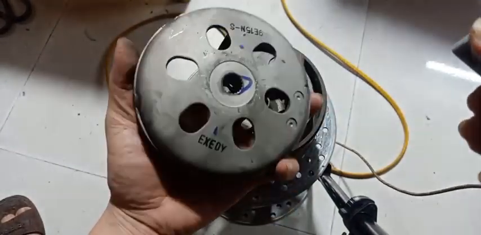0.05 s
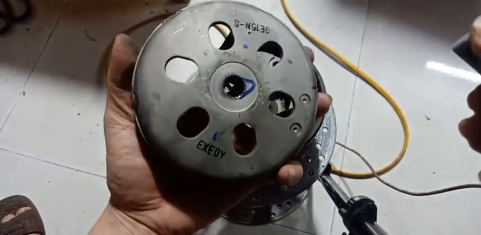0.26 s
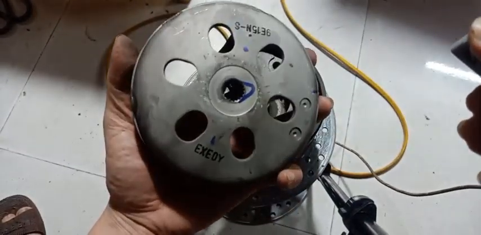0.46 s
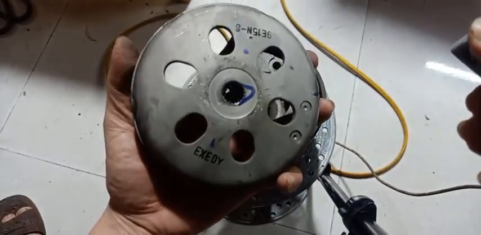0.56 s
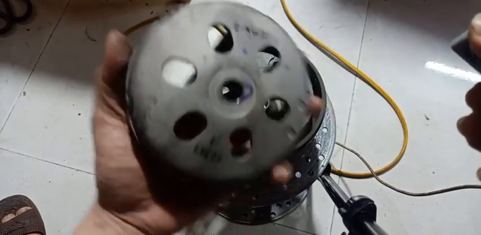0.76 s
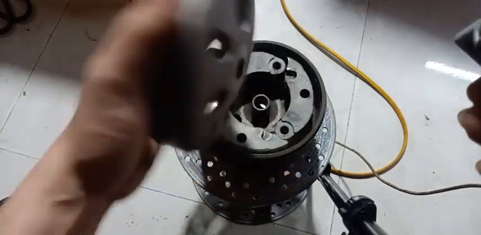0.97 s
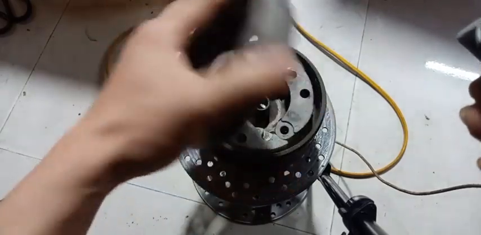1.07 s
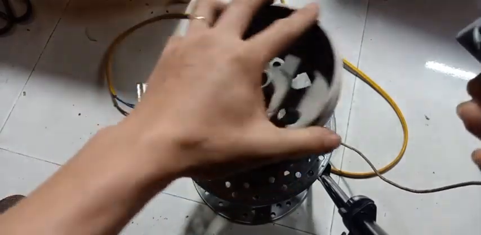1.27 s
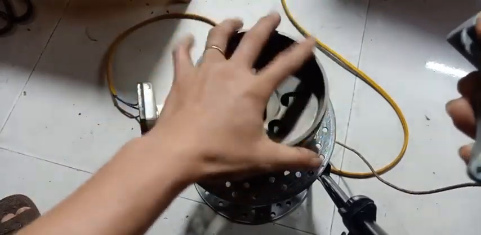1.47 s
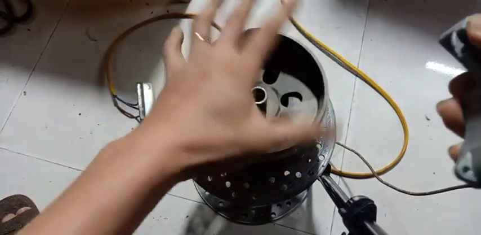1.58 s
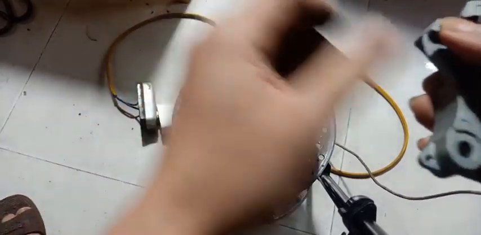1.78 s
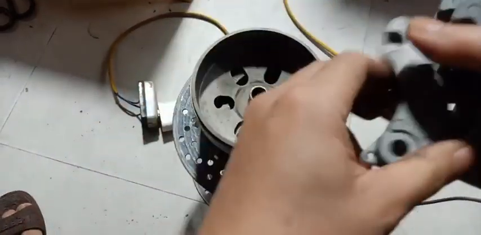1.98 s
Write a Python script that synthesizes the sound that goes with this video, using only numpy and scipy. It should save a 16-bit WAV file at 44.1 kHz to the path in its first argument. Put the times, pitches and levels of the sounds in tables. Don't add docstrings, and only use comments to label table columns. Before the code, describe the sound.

One sharp metallic clank of a steel part set on other metal, ringing briefly in a hard room

```python
import sys
import numpy as np
from scipy import signal
from scipy.fft import rfft, irfft
from scipy.io import wavfile
from scipy.ndimage import uniform_filter1d

SR = 44100
rng = np.random.default_rng(int(sys.argv[2]) if len(sys.argv) > 2 else 0)


def attenuation_scalar(level_db):
    decades = np.asarray(level_db, float) / 20
    return 10 ** decades


def generate_wav(signal):
    frames = np.transpose(np.atleast_2d(signal))
    scaled = np.clip(frames, -1, 1) * 32767
    pcm = np.round(scaled).astype(np.int16)
    wavfile.write(sys.argv[1], SR, pcm)


N = 90272

# (time [s], firing rate [Hz], exhaust [dB], low boom [dB], mechanical hiss [dB])
RIDE = [(0, 35.38, -64, -60, -56.5), (.2, 34.97, -69.5, -68, -58.5), (.42, 34.4, -59.5, -76, -55),
        (.8, 34.86, -56, -70, -50.5), (1.04, 35.1, -48, -88, -47.5), (1.2, 34.91, -50.5, -68, -46.5),
        (1.44, 34.71, -49.5, -65, -44.5), (1.49, 34.6, -50, -64, -49), (1.62, 33.51, -56, -76, -47),
        (1.72, 32.75, -71, -60.5, -50), (1.9, 32.3, -72, -57.5, -58.5), (2.05, 33.02, -72, -59.5, -55.5)]
# (frequency [Hz], level [dB])
EXHAUST_TONE = [(70, -9.5), (140, -2), (209, 7), (260, -1.5), (320, -2), (520, -6), (1000, -16.5),
                (2200, -60)]
# (frequency [Hz], level [dB])
BOOM_TONE = [(30, -38.5), (70, -7.5), (100, 13), (135, 15.5), (180, -12.5), (300, -72.5)]
# (frequency [Hz], level [dB])
HISS_TONE = [(150, -28.5), (400, -3), (900, 1), (1500, -3), (2600, 1.5), (4000, -7.5), (6000, -6),
             (15000, -23.5)]
WHINE_HZ = [2583, 2640, 2390, 922]
# (pitch wander [%], level re hiss [dB])
WHINE = [(.25, -12), (.45, -11), (2., -14), (.4, -13)]
# (frequency [Hz], level [dB])
TOWN_TONE = [(25, -42), (130, -3.5), (230, -8), (690, -9), (1200, -17), (2200, -14), (5000, -23),
             (15000, -51)]
# (time [s], ring [dB], crack [dB], crack T60 [s])
CONTACTS = [
    (1.5057, -12, -4, .018),
    (1.5172, -6, -8, .025),
    (1.5222, -22, -14, .06),
    (1.533, -26, -19, .05),
    (1.541, -28, -21, .04),
]
DRUM_HZ = [2500, 2627, 2665, 2706, 3499, 3920, 4153, 4420, 4594, 4978, 5312, 6148, 6680, 7477]
DRUM_DB = [-13, -20, -11, -12, -12, -12, 2, -12, -1, 0, -13, -10, -10, -10]
DRUM_T60 = [0.13, 1, 0.14, 0.12, 0.25, 0.26, 0.14, 0.09, 0.21, 0.21, 0.13, 0.4, 0.055, 0.26]
STACK_HZ = [1850, 2010, 2315, 2387, 3209, 6798, 7276, 8200]
# (level [dB], T60 [s])
STACK = [(-14, .08), (-13, .08), (-24, .4), (-23, .4), (-11, .12), (-11, .12), (-12, .16), (-12, .14)]
# (frequency [Hz], level [dB])
CRACK_TONE = [(60, -26), (300, -23.5), (1300, -7.5), (2200, -5), (2700, -2), (4600, -8), (6200, -5),
              (15000, -19)]
THUD_S = [1.5066, 1.5186, 1.5212, 1.5185]
# (frequency [Hz], left level [dB], right level [dB])
THUD = [(800, -17, -23), (760, 0, -20), (430, -6, -15), (155, -30, -28)]
# (band centre [Hz], T60 [s], level [dB])
ROOM = [(139.15, .14, -28.5), (320.5, 0.123, -30.5), (556, 0.2, -28), (1160, 0.18, -23),
        (2590, 0.73, -19.5), (5162, 0.46, -23.5), (8000, 0.56, -15), (12600, 0.1, -14)]
# (frequency [Hz], level [dB])
PHONE_TONE = [(25, -9), (80, 0), (1600, 0), (2600, 3), (3350, -6), (4200, 2), (6300, 0), (7000, -10)]
PORT_HZ = [7000, 9200, 10000, 10900, 12200, 14100, 14800]
LEFT_PORT_DB = [0, 2, -21.5, 0.5, 8, -4.5, -19]
RIGHT_PORT_DB = [-0.5, -4, -7, -15, -8, -12, -24]

LAG = 19
ALIKE_HZ = 575
LEFT_DB = 1
SPREAD_S = 0.027
TOWN_DB = -56
CHOKE_S, CHOKE_DB, CHOKING_S = 1.555, -10, .03
TOP_HZ = 15700


def unit(x):
    return x / np.sqrt(np.mean(x ** 2))


def colour(x, table):
    hz, db = np.array(table, float).T
    grid_hz = np.arange(2049) * SR / 4096
    log_gain = np.interp(np.log(grid_hz + 1), np.log(hz), db) * np.log(10) / 20
    cepstrum = irfft(log_gain) * np.r_[1, np.full(2047, 2), 1, np.zeros(2047)]
    impulse = irfft(np.exp(rfft(cepstrum)))
    return signal.fftconvolve(x, np.atleast_2d(impulse), axes=1)[:, :N]


def band(x, hz, width):
    return signal.lfilter(*signal.iirpeak(hz, hz / width, fs=SR), x)


def walk(rate):
    k = int(SR / rate)
    steps = np.repeat(rng.standard_normal(N // k + 1), k)
    return unit(uniform_filter1d(uniform_filter1d(steps, k), k)[:N])


def ports():
    noise = rng.standard_normal((3, N))
    low = signal.butter(1, ALIKE_HZ, "low", fs=SR)
    high = signal.butter(1, ALIKE_HZ, "high", fs=SR)
    shared = np.array([np.roll(noise[0], LAG), noise[0]])
    return signal.lfilter(*low, shared) + signal.lfilter(*high, noise[1:])


def firing_puffs(turn):
    size = attenuation_scalar(1.3 * rng.standard_normal(100))[turn.astype(int)]
    puff = np.diff(np.floor(turn), prepend=0) * size
    f = np.arange(N // 2 + 1) * SR / N
    late_s = SPREAD_S * (1 - np.cos(2 * np.pi * f / 330))
    phase = 2 * np.pi * np.cumsum(late_s) * SR / N
    puff = unit(irfft(rfft(puff) * np.exp(-1j * phase), N))
    return np.array([np.roll(puff, LAG), puff]) + 0.13 * ports()


def engine_clatter(turn):
    hiss = unit(colour(ports(), HISS_TONE))
    for hz, (wander, db) in zip(WHINE_HZ, WHINE):
        level = attenuation_scalar(db + 2.7 * walk(12.8))
        phase = 2 * np.pi * np.cumsum(hz * (1 + wander / 100 * walk(30))) / SR
        late = np.array([[-2 * np.pi * hz * LAG / SR], [0]])
        hiss = hiss + level * np.sin(phase + late)
    return hiss * (1 + 0.054 * np.cos(2 * np.pi * turn))


def motorbike(t):
    s, *courses = np.array(RIDE).T
    hz, exhaust_db, boom_db, hiss_db = (np.interp(t, s, course) for course in courses)
    turn = np.cumsum(hz * (1 + .003 * walk(20))) / SR
    puff = firing_puffs(turn)
    exhaust = unit(colour(puff, EXHAUST_TONE)) * attenuation_scalar(exhaust_db)
    boom = unit(colour(puff, BOOM_TONE)) * attenuation_scalar(boom_db)
    clatter = engine_clatter(turn) * attenuation_scalar(hiss_db + walk(15.36))
    return exhaust + boom + clatter


def town():
    return unit(colour(ports(), TOWN_TONE)) * attenuation_scalar(TOWN_DB + walk(1.7))


def steel_ring(t):
    f = np.array(DRUM_HZ + STACK_HZ)[:, None]
    db, t60 = np.array(list(zip(DRUM_DB, DRUM_T60)) + STACK).T[:, :, None]
    apart = np.pi * rng.uniform(-.45, .45, f.shape)
    ring = np.zeros((2, N))
    for s, ring_db, _, _ in CONTACTS:
        k = slice(int(s * SR), int((s + 0.53) * SR))
        u = np.clip(t[k] - s, 0, None)
        rise = 1 - np.exp(-u / 0.00018)
        phase = 2 * np.pi * rng.random(f.shape)
        decay = attenuation_scalar(db - 60 * u / t60)
        for c in range(2):
            modes = np.sin(2 * np.pi * f * u + phase + c * apart) * decay
            ring[c, k] += attenuation_scalar(ring_db) * rise * modes.sum(axis=0)
    choke = attenuation_scalar(CHOKE_DB * np.clip((t - CHOKE_S) / CHOKING_S, 0, 1))
    return .5 * ring * choke


def metal_crack(t):
    envelope = np.zeros(N)
    for s, _, crack_db, crack_s in CONTACTS:
        u = np.clip(t - s, 0, None)
        envelope += attenuation_scalar(crack_db) * (1 - np.exp(-u / 0.00018)) * attenuation_scalar(-60 * u / crack_s)
    return unit(colour(ports(), CRACK_TONE)) * envelope


def air_thud(t):
    thud = np.zeros((2, N))
    for s, (hz, left_db, right_db) in zip(THUD_S, THUD):
        thud += attenuation_scalar([[left_db], [right_db]]) * np.sin(2 * np.pi * np.clip((t - s) * hz, 0, 1))
    return thud


def room(x, t):
    u = t[:SR // 2]
    tail = np.zeros((2, len(u)))
    for hz, t60, db in ROOM:
        noise = rng.standard_normal((2, len(u)))
        octave = unit(band(band(noise, hz, hz), hz, hz))
        tail += attenuation_scalar(db - 60 * u / t60) * octave / np.sqrt(t60 * SR / 14)
    build_up = 1 - np.exp(-u / 0.0028)
    return signal.fftconvolve(x, tail * build_up, axes=1)[:, :N]


def scene():
    t = np.arange(N) / SR
    hit = steel_ring(t) + metal_crack(t) + air_thud(t)
    outside = (town() + motorbike(t)) * attenuation_scalar([[LEFT_DB / 2], [-LEFT_DB / 2]])
    return outside + hit + room(hit, t)


def roll_off(x):
    return signal.sosfilt(signal.butter(12, 15690, fs=SR, output="sos"), x)


def record(dry):
    x = colour(dry, PHONE_TONE)
    left = colour(x[:1], list(zip(PORT_HZ, LEFT_PORT_DB)))
    right = colour(x[1:], list(zip(PORT_HZ, RIGHT_PORT_DB)))
    top_cut = signal.ellip(8, .2, 70, TOP_HZ, fs=SR, output="sos")
    x = signal.sosfilt(top_cut, np.vstack([left, right]))
    mix = np.clip(1.213 * np.tanh(x), -1, 1)
    return roll_off(mix)


dry = scene()
out = record(dry)
generate_wav(out)
```